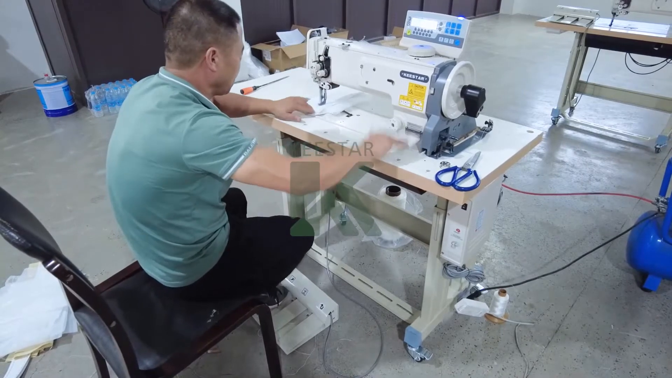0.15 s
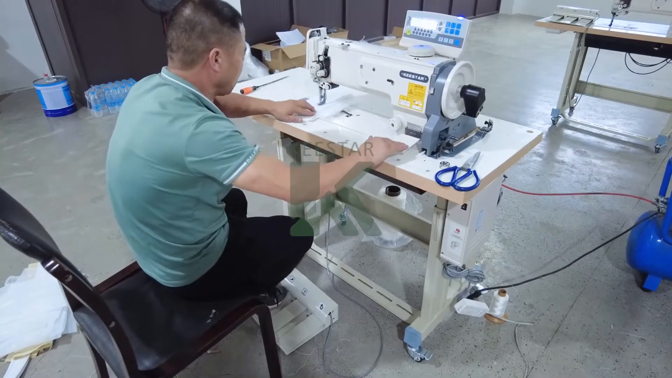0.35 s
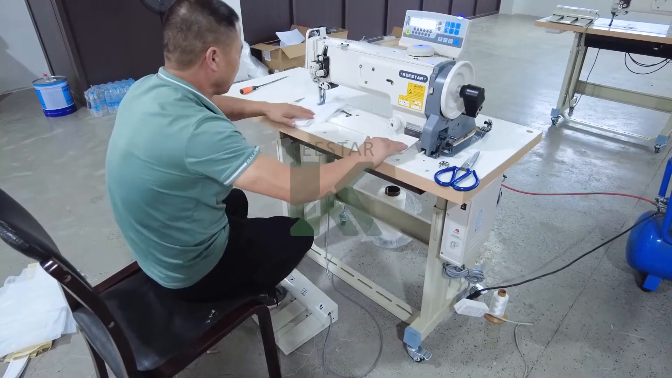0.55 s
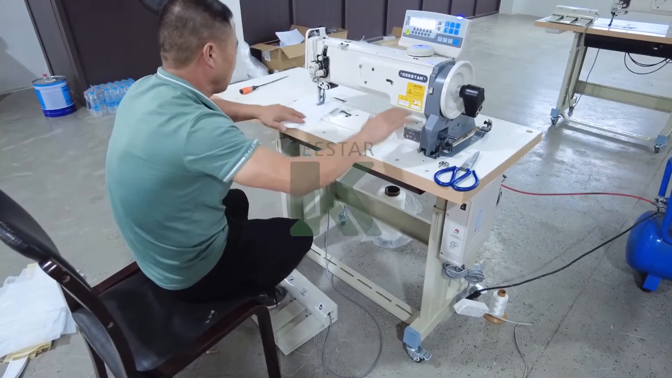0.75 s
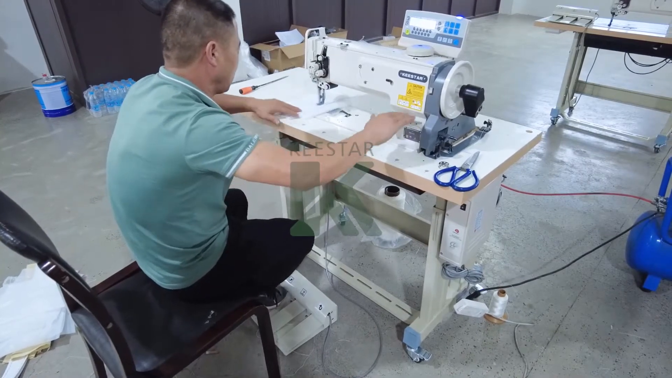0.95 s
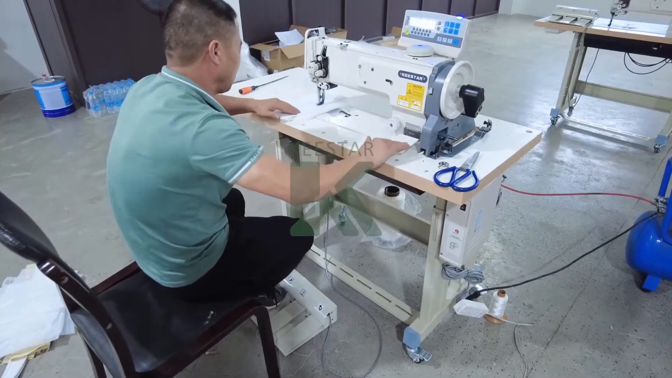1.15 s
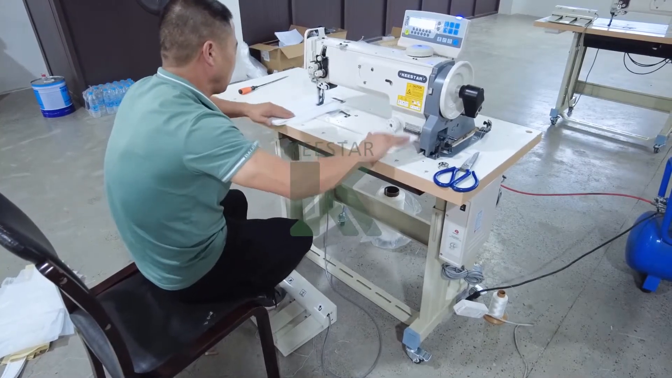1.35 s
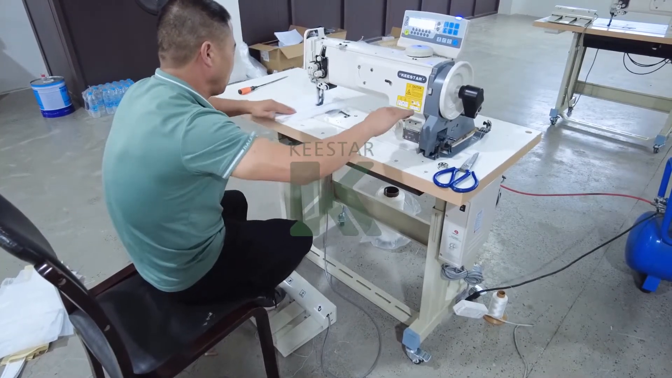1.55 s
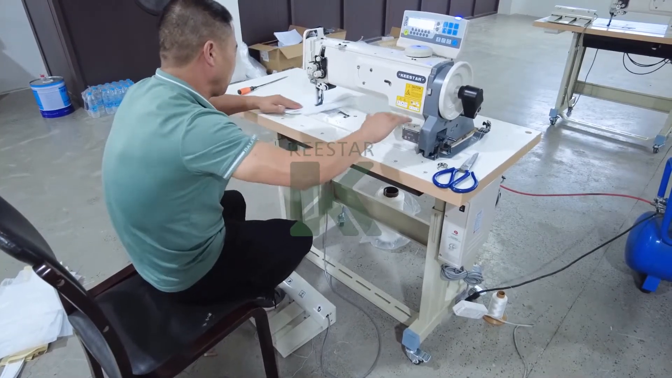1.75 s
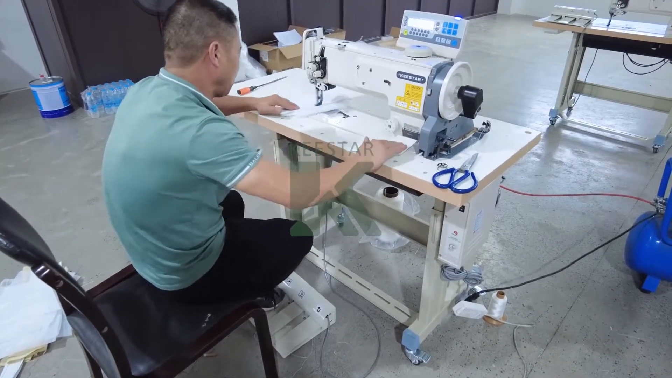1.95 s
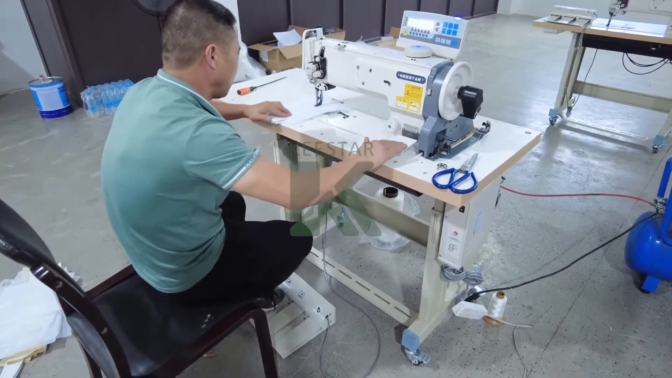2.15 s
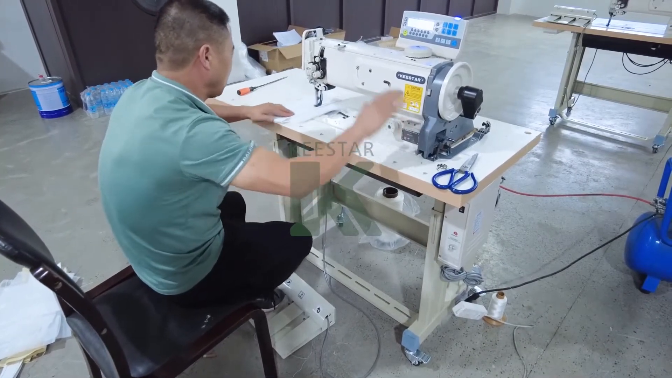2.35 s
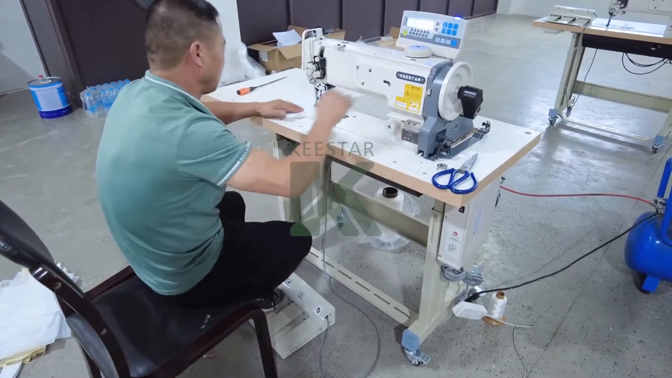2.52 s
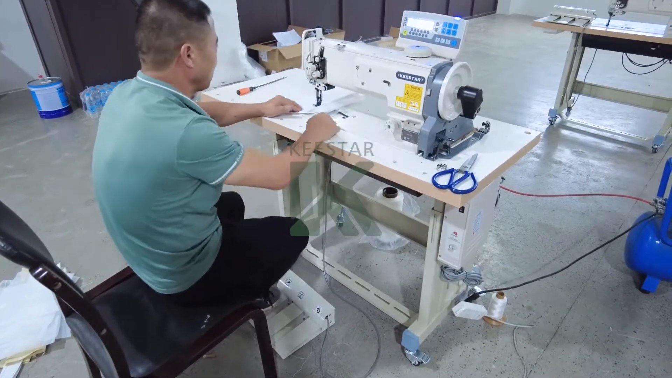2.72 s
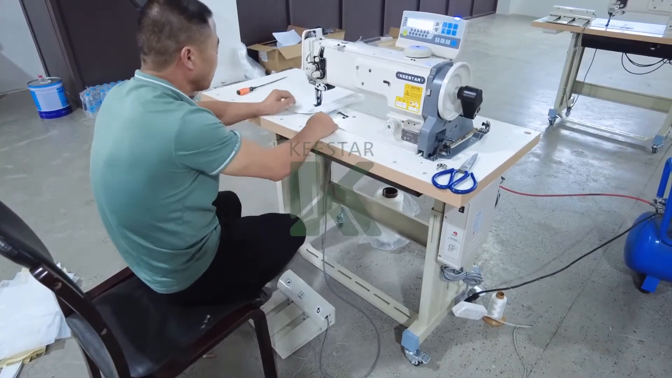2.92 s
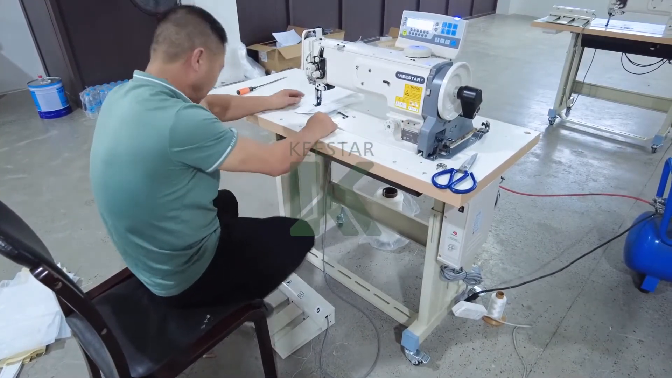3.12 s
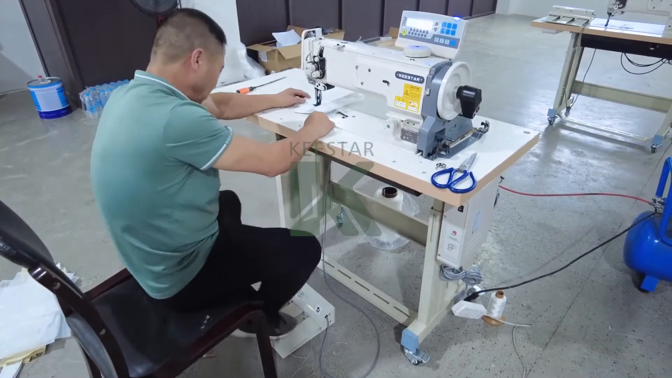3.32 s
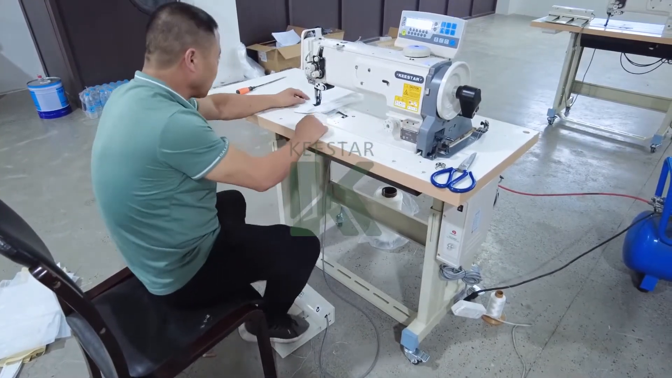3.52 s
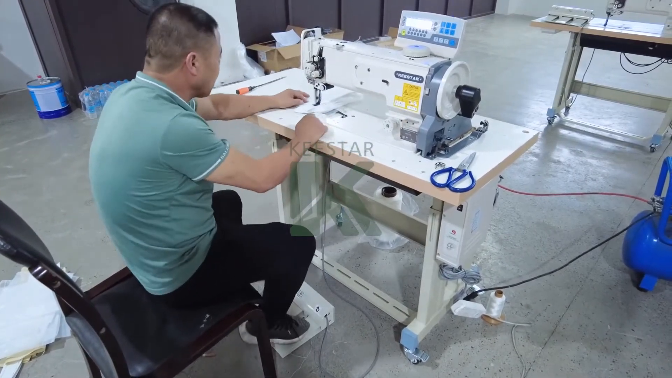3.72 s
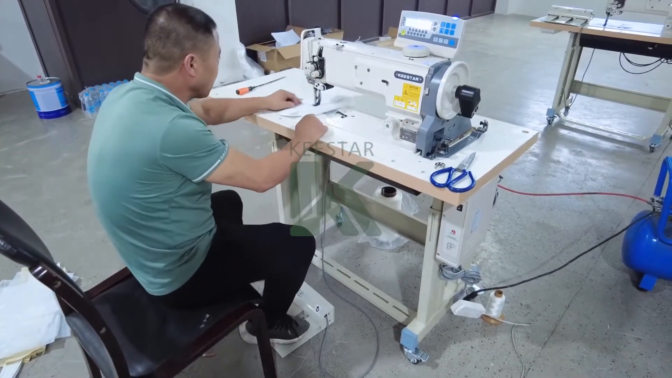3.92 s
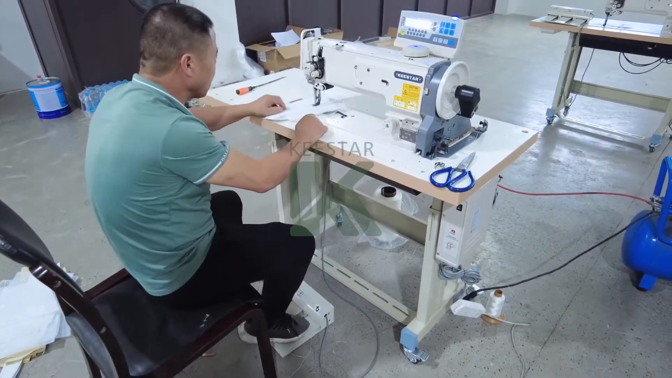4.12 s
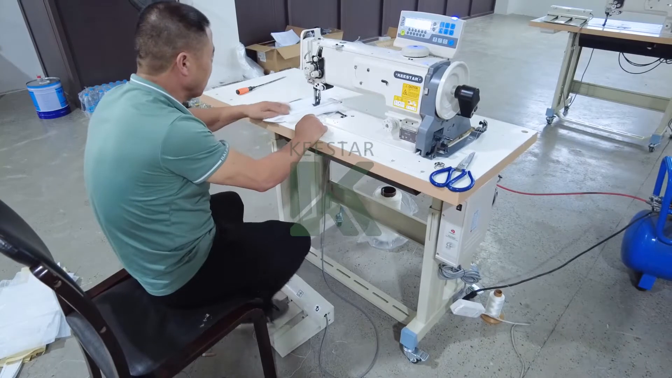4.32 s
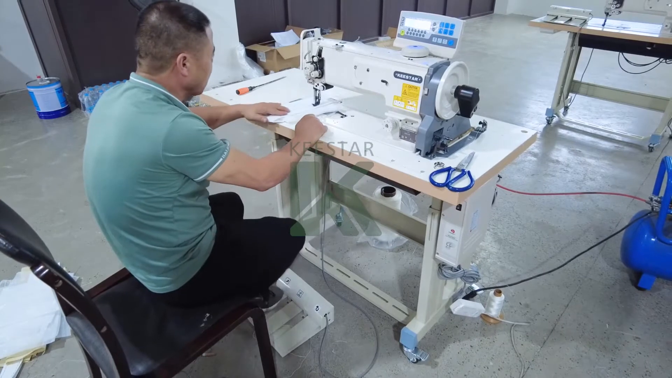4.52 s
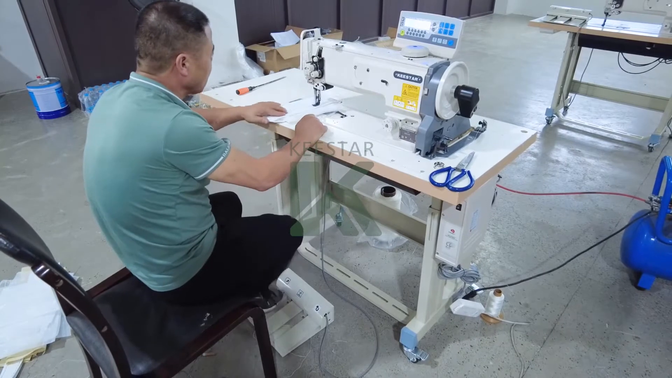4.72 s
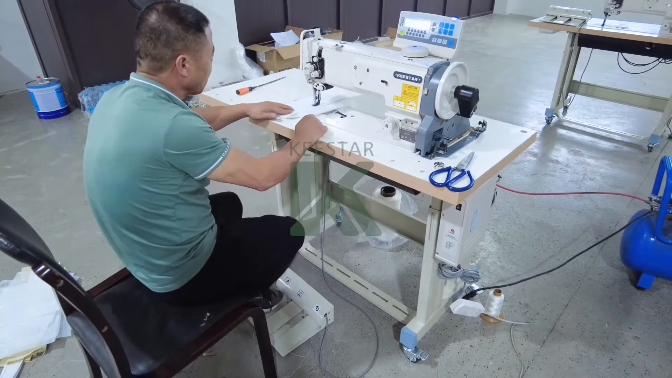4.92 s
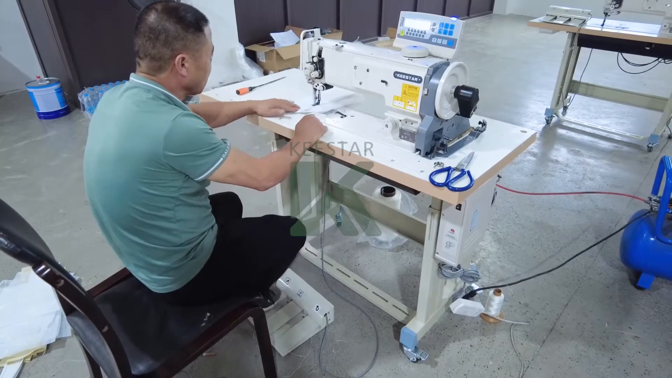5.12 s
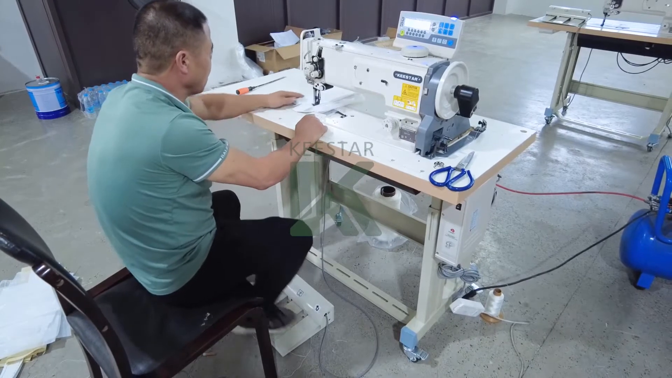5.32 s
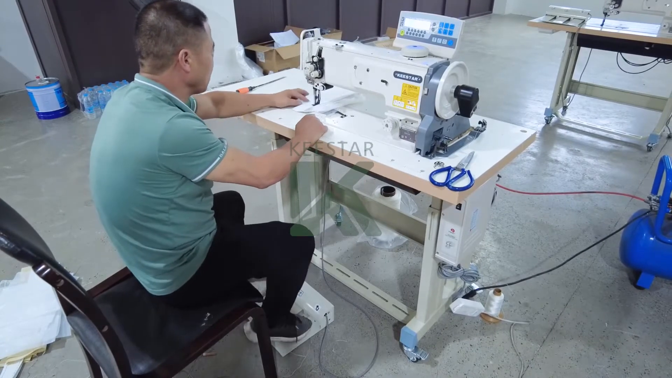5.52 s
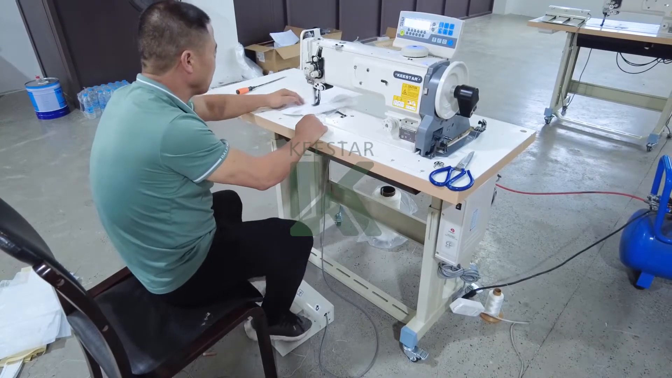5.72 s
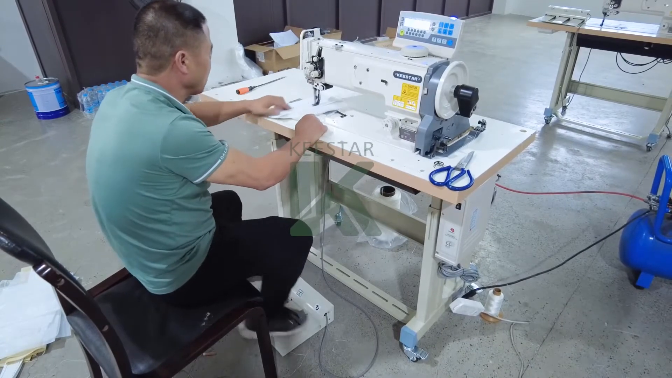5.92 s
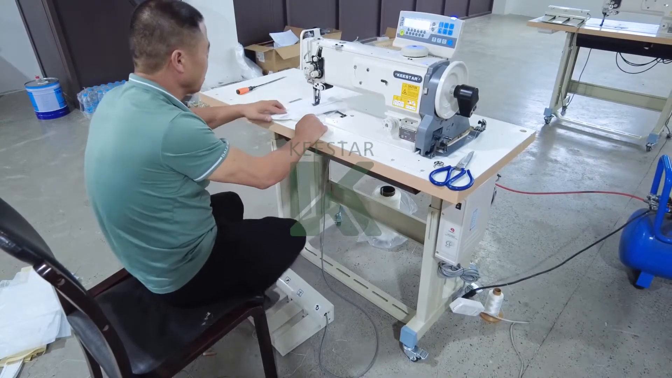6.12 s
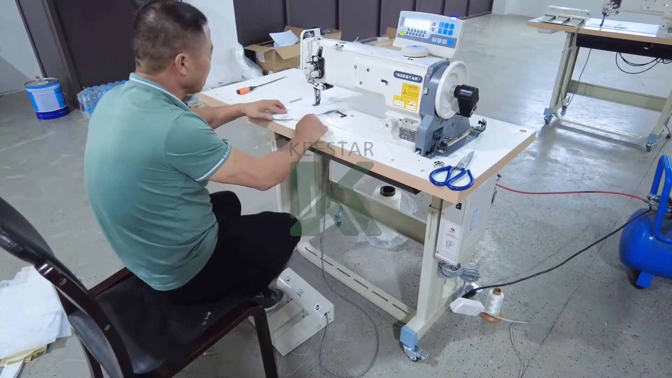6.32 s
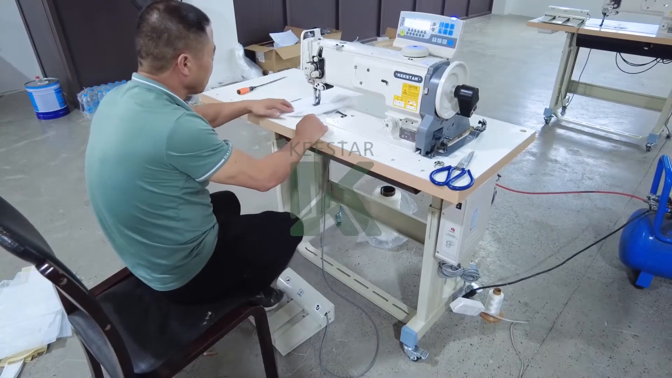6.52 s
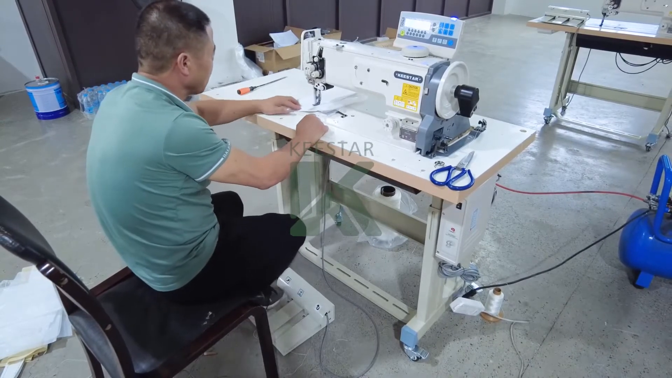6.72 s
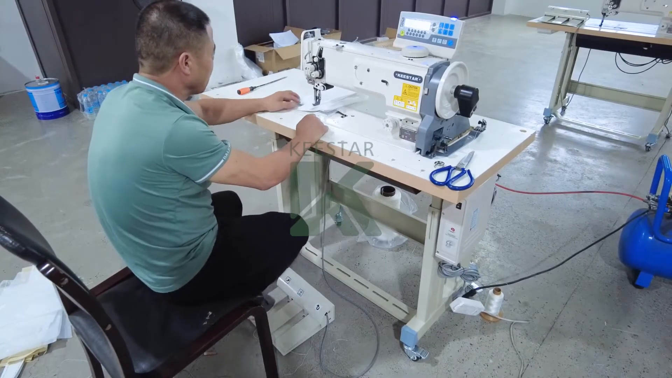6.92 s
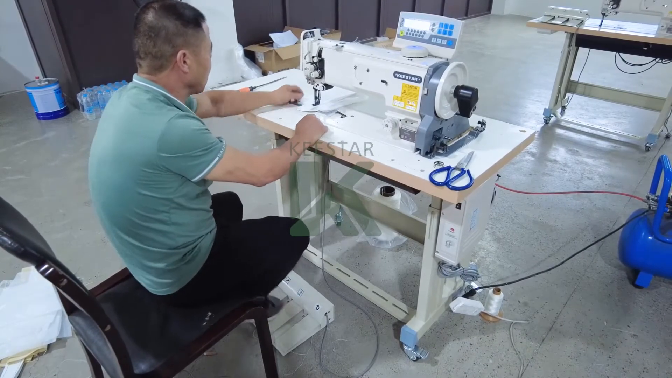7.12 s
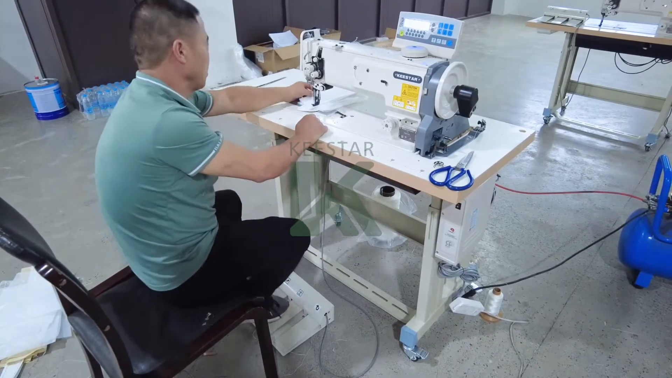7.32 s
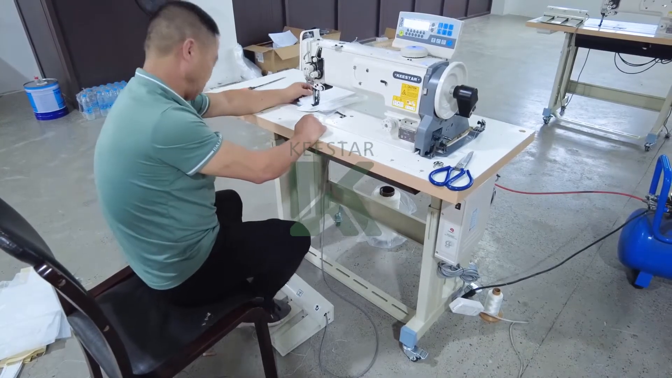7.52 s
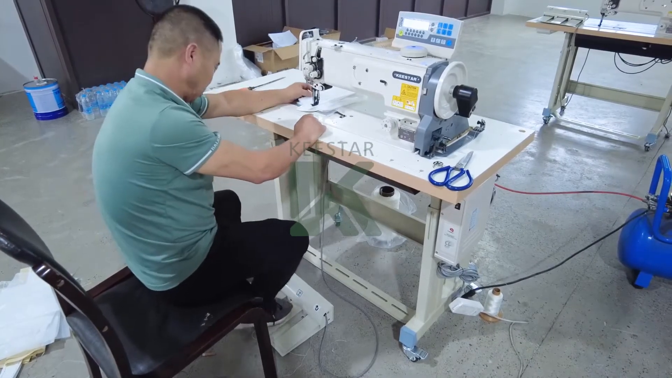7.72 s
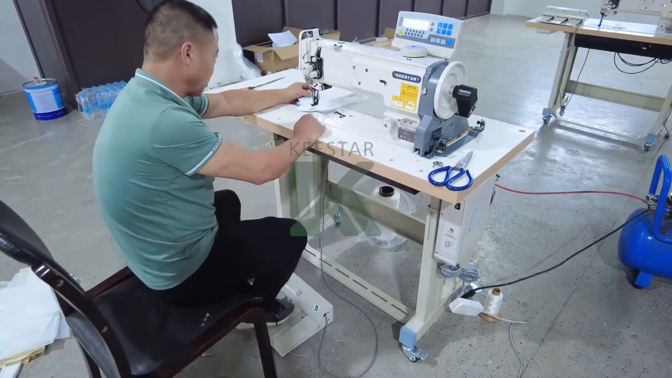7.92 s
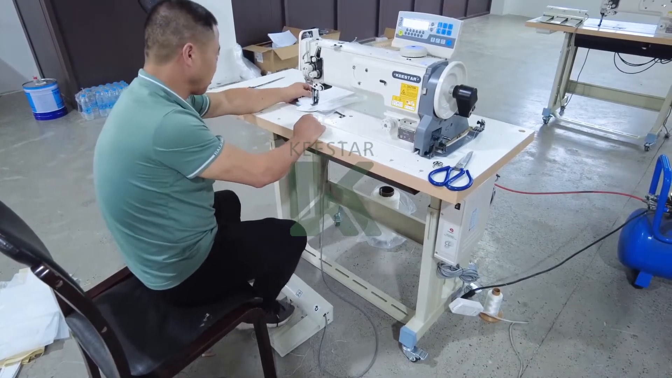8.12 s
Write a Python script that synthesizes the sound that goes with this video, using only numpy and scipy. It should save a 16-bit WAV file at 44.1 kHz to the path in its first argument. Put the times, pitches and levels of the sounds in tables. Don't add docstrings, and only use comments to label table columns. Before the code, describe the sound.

Deep mechanical sewing whirr with clanking metal, a ringing pause, four brief clutch-and-brake bursts, then a small air hiss over far factory hum.

```python
import sys
import numpy as np
from scipy import signal
from scipy.fft import rfft, irfft, next_fast_len
from scipy.io import wavfile
from scipy.ndimage import uniform_filter1d, map_coordinates

SR = 44100
rng = np.random.default_rng(int(sys.argv[2]) if len(sys.argv) > 2 else 0)


def store_wav(level_fs):
    pcm = np.round(np.clip(np.atleast_2d(level_fs), -1, 1) * 32767)
    wavfile.write(sys.argv[1], SR, pcm.T.astype(np.int16))


def magnitude_from_level(level_db):
    exponent = np.asarray(level_db, float) / 20
    return 10 ** exponent


N = 359856
LEAD = SR
M = N + LEAD
T = (np.arange(M) - LEAD) / SR


def unit(x):
    return x / np.sqrt(np.mean(x ** 2) + 1e-20)


def along(points, hz):
    f, v = np.transpose(points)
    return np.interp(np.log(hz + 1), np.log(f + 1), v)


def wobble(rate):
    steps = np.arange(0, M + 64, 64)
    knots = rng.standard_normal(int(M * rate / SR) + 5)
    return np.interp(np.arange(M), steps, map_coordinates(knots, [steps * rate / SR]))


def filtered(x, response):
    m = next_fast_len(x.shape[-1] + SR // 20)
    return irfft(rfft(x, m) * response(np.fft.rfftfreq(m, 1 / SR)), m)[..., :x.shape[-1]]


def modes(peaks, f):
    total = 0
    for k, (centre, width, db) in enumerate(peaks):
        total = total + (-1) ** k * magnitude_from_level(db) * 1j * f * width / (centre * centre - f * f + 1j * f * width)
    return total


def noise(spectrum, peaks=((1000, 100, -99),)):
    def colour(f):
        return magnitude_from_level(along(spectrum, f)) * np.sqrt(1 + abs(modes(peaks, f)) ** 2)
    return unit(filtered(rng.standard_normal(M), colour))


def patchy(x, depth_db, size, bins, frames):
    z = signal.stft(x, nperseg=size)[2]
    field = uniform_filter1d(uniform_filter1d(rng.standard_normal(z.shape), bins, 0), frames, 1)
    return unit(signal.istft(z * magnitude_from_level(depth_db * unit(field)), nperseg=size)[1][:M])


# (start [s], spin-up [s], stop [s], casting rush [dB])
RUNS = [
    (-1, .1, 2.57, -30),
    (3.6, .07, 4.1, -29),
    (4.65, .12, 5.06, -30),
    (5.42, .07, 5.88, -29.5),
    (6.25, .13, 6.67, -30),
]


def speed(late_s, power):
    rise_power, coast_s, coast_power = .85, .12, 1.5
    gain = 0
    for start, up, stop, db in RUNS:
        rise = np.clip((T - start) / up, 0, 1) ** (rise_power * power)
        fall = np.clip(1 + (stop + late_s - T) / coast_s, 0, 1) ** (coast_power * power)
        gain = gain + magnitude_from_level(db) * rise * fall
    return gain


def shaft_angle():
    shaft_hz, sag, sag_s = 26.57, .045, .16
    slowed = sum(np.clip((T - stop) / sag_s, 0, 1) * (T < stop + .3) for _, _, stop, _ in RUNS)
    return 2 * np.pi * shaft_hz * np.cumsum(1 - sag * slowed) / SR + 0.05 * wobble(5)


# (time [s], level [dB], half length [s])
SURGES = [(0, -25, .04), (.13, -23, .025), (.3, -18, .06), (.5, -22.5, .11), (.88, -20.5, .07),
          (1.17, -20, .08), (1.3, -26, .04), (1.53, -22, .11), (2.0, -16.5, .07), (2.12, -26, .02),
          (2.3, -23, .08), (2.54, -22, .08), (2.7, -19, .035), (2.8, -27, .04), (3.8, -22, .07),
          (4.05, -25, .03), (4.16, -16, .05), (4.68, -31, .03), (4.84, -22, .06), (5.1, -22, .1),
          (5.48, -28, .05), (5.63, -21, .06), (5.8, -20, .07), (5.95, -25, .04), (6.08, -23, .05),
          (6.29, -28, .025), (6.42, -22, .08), (6.53, -25, .04), (6.72, -23, .08), (6.86, -28, .06)]


def table_swell():
    surges = sum(magnitude_from_level(db - 4.5) * np.exp(-((T - s) / half) ** 2) for s, db, half in SURGES)
    return speed(late_s=.06, power=1) + surges


# (frequency [Hz], width [Hz], level [dB])
TABLE_MODES = [(240, 18.8, 2.5), (274, 30, -5), (307, 48, -10), (401, 34.5, -14.5), (523, 136, -19.5)]


def table_drum(swell):
    grind = unit(filtered(rng.standard_normal(M), lambda f: modes(TABLE_MODES, f)))
    return swell * magnitude_from_level(-6.5) * grind


# (multiple of shaft speed [1], level [dB])
ORDERS = [(2, -19), (4, -11.5), (5, -16), (8, -17), (10, -10), (11, -15), (12, -5), (13, -22), (14, -10),
          (16, -19), (18, -16), (19, -15), (21, -17), (40, -30), (43, -30), (50, -27)]


def shaft_hum(turn, swell):
    ninth = np.sin(9 * turn + .25 * wobble(9))
    orders = 0
    for k, db in ORDERS:
        strength = magnitude_from_level(db) * (1 + 0.3 * wobble(4))
        orders = orders + strength * np.sin(k * turn + (0.3 + .025 * k) * wobble(6))
    return swell * magnitude_from_level(0.3) * ninth + speed(0, 1) * magnitude_from_level(2) * orders


# (frequency [Hz], density [dB per Hz])
CASTING = [(25, -22), (60, -10), (110, -6.5), (180, -1.5), (300, 5.5), (500, -2), (680, -9.5), (1000, -3),
           (1500, -3.5), (2100, -8), (2400, -15), (3600, -19.5), (6000, -17.5), (9000, -44.5)]
# (frequency [Hz], width [Hz], level [dB])
CASTING_PEAKS = [(1320, 110, 3), (2840, 480, 10), (4380, 300, 4.5)]


def casting_rush(turn):
    throb = magnitude_from_level(3 + 1.2 * np.cos(2 * turn) + 1.3 * wobble(25))
    streaks = patchy(noise(CASTING, CASTING_PEAKS), depth_db=2.5, size=1024, bins=1, frames=3)
    return speed(0, 1) * (throb * streaks + magnitude_from_level(-6) * grit())


def grit():
    per_s, spread_db, centre_hz, cycles = 450, 4, 1550, 14
    at, tone, size = rng.random((3, round(per_s * M / SR)))
    hz = (centre_hz * np.exp(1.3 * (tone - .5)))[:, None]
    k = np.arange(600)
    strength = magnitude_from_level(spread_db * np.minimum(-np.log(1 - size), 3.2))[:, None]
    envelope = (1 - np.exp(-k / 30)) * np.exp(-k * hz / SR * 3 / cycles)
    rings = strength * envelope * np.sin(2 * np.pi * hz * k / SR)
    where = (at * M).astype(int)[:, None] + k
    return unit(np.bincount(where.ravel(), rings.ravel(), M + len(k))[:M])


# (frequency [Hz], density [dB per Hz])
BELT = [(3000, -21), (5500, -3), (8000, 4), (10000, -4.5), (12500, -3), (15600, -0.5), (16000, -37.5)]
# (frequency [Hz], width [Hz], level [dB])
BELT_PEAKS = [(7570, 140, -4.5), (9070, 280, 11.5), (10900, 540, 3), (14100, 400, 4)]


def belt_hiss(turn):
    throb = magnitude_from_level(-7.5 + 1.8 * np.cos(2 * turn) + 2.2 * wobble(30))
    rub = patchy(noise(BELT, BELT_PEAKS), depth_db=2, size=512, bins=5, frames=7)
    return speed(late_s=-.012, power=1.3) * throb * rub


# (frequency [Hz], level [dB])
CRACK = [(300, -10), (1200, 0), (3000, 1.5), (5000, -2.5), (8000, 4), (12000, -2), (16500, -8),
         (16900, -60)]


def strikes(events, metal, ring_db, rattle_db, knock_db, t60, rough, bright_hz=7000):
    out, blows = np.zeros(M + SR), np.zeros(M)
    hz, level_db, life = np.transpose(metal)[:, :, None]
    t = np.arange(round(min(life.max(), .4) * SR) + SR // 20) / SR
    for s, db, treble_db in events:
        level_luck, pitch_luck = rng.standard_normal((2, len(metal), 1))
        wander = rough * np.cumsum(rng.standard_normal((len(metal), len(t))), axis=1)
        level = magnitude_from_level(level_db + 1.6 * level_luck + (treble_db + 7.5) * (hz > bright_hz))
        pitch = hz * (1 + 0.0704 * rough * pitch_luck)
        decay = np.exp(-np.log(1000) * t / life)
        ring = np.sum(level * decay * np.sin(2 * np.pi * pitch * t + wander), axis=0)
        puff = rng.standard_normal(len(t)) * (magnitude_from_level(-60 * t / t60) + 1.3 * magnitude_from_level(-60 * t / 0.0074))

        def colour(f):
            return magnitude_from_level(along(CRACK, f) + np.interp(f, [6000, 8000], [0, treble_db + 8.5]))
        rattle = filtered(puff, colour)
        onset = 1 - np.exp(-t / 0.0009)
        at = LEAD + round(s * SR)
        out[at:at + len(t)] += magnitude_from_level(db) * (magnitude_from_level(ring_db) * ring + magnitude_from_level(rattle_db) * rattle) * onset
        blows[at] = magnitude_from_level(db + knock_db + 42)
    return out[:M] + filtered(blows, lambda f: modes(TABLE_MODES, f))


# (time [s], peak [dB], treble [dB])
CLANKS = [(0.1106, -15.5, -19), (1.0185, -23, -21), (1.2745, -21, -10), (1.791, -18, -18),
          (2.1544, -21, -9), (4.709, -35, -5), (4.728, -23.5, -13), (6.3164, -33, -3), (6.342, -23, -13)]
# (frequency [Hz], level [dB], t60 [s])
BAR = [(1700, -2, 0.066), (2910, -2.5, .07), (2966, 1, .07), (4070, 0, 0.1), (6010, -4, 0.08),
       (7750, 1, 0.12), (9760, 0, 0.079), (10950, -8.5, 0.11), (11830, 0.5, 0.045)]


def needle_bar():
    return strikes(CLANKS, BAR, ring_db=-12, rattle_db=-5.5, knock_db=-12, t60=.05, rough=.12)


# (time [s], peak [dB], treble [dB])
CHATTER = [(.5995, -17, -9), (.6347, -24, -11), (.6818, -9, -11), (.6925, -13, -11), (.7005, -16, -11),
           (.712, -14, -11), (.7225, -17, -11), (.731, -15, -9), (.7385, -14, -7), (.749, -16, -9),
           (.765, -20, -10), (1.3127, -15, -6), (1.364, -21, -10), (1.3726, -13, -10), (1.381, -16, -10),
           (1.392, -19, -11), (2.1425, -19, -9), (2.2056, -8, -9), (2.215, -15, -10), (2.2336, -14, -8),
           (2.243, -14, -10), (2.255, -18, -10), (2.27, -19, -11), (2.288, -21, -11), (4.0608, -21, -14),
           (4.0724, -17, -12), (4.082, -19, -13), (4.091, -19, -13)]
# (frequency [Hz], level [dB], t60 [s])
FOOT = [(1700, -2, .05), (2910, -2, .045), (4070, 2, .06), (4400, -6, .04), (6010, -1, .045),
        (6400, -5, .04), (7750, 1, .08), (9400, 0, .05), (10950, -5, .06), (11830, -3, .035)]


def foot_chatter():
    return strikes(CHATTER, FOOT, ring_db=-12, rattle_db=-6, knock_db=-14, t60=.04, rough=.16)


# (time [s], peak [dB], take-up length before it [s], take-up scrape [dB])
STARTS = [
    (3.6502, -4.5, .0386, -3),
    (5.4794, -6, .0434, 4),
]
# (share of take-up [1], level [dB], treble [dB])
GRIP = [
    (-1.2, -35, -4),
    (-1, -21, -9),
    (-.664, -12.5, -18),
    (.02, -3, -6),
    (.1, -1.5, -22),
    (.27, -10, -18),
    (.34, -12, -20),
]
# (frequency [Hz], level [dB], t60 [s])
CLUTCH = [(1292, -1.5, .08), (1670, -7, .05), (2050, -8, 0.034), (2750, 1.5, 0.039), (3320, 1.5, .035),
          (4260, -9, .03), (5800, -14, .03), (7800, 1, .03)]


def clutch():
    grips = []
    for s, db, length, scrape_db in STARTS:
        for share, rel_db, treble_db in GRIP:
            grips.append((s + share * length, db + rel_db + scrape_db * (share == -1), treble_db))
    return strikes(grips, CLUTCH, ring_db=-7, rattle_db=-6, knock_db=-16, t60=.014, rough=0.19)


# (time [s], peak [dB], treble [dB])
BRAKE = [
    (4.1384, -6.5, -6),
    (4.1425, -12, -11),
    (4.149, -17, -12),
]
# (frequency [Hz], level [dB], t60 [s])
BRAKE_RING = [(1597, -10, .08), (2670, 4, 0.033), (3240, -3, 0.097), (4463, -9, 0.08), (5960, -8, .07),
              (7600, -6.5, 0.33), (8694, -5, .06), (9700, -4, 0.08), (10620, -14, 0.087)]


def brake():
    return strikes(BRAKE, BRAKE_RING, ring_db=-12, rattle_db=-1.5, knock_db=-11.5, t60=.04, rough=.08)


# (time [s], peak [dB], treble [dB])
LEVER = [
    (5.845, -21, -10),
    (5.8495, -12.5, -10),
    (5.8555, -12, -12),
    (5.862, -17, -16),
    (5.8741, -18, -20),
    (5.8947, -22, -19),
    (5.9197, -21, -15),
    (5.928, -24, -16),
]
# (frequency [Hz], level [dB], t60 [s])
LEVER_RING = [(1066, 2, 0.12), (1475, -11, .1), (1770, 2, .06), (2460, -9, .4), (2490, -2.5, 0.6),
              (3030, -7, 0.22), (4730, -3, 0.04), (5080, 6, 0.035), (5300, 3, .03), (6300, -8, .04),
              (7640, -1, .05)]


def lever():
    return strikes(LEVER, LEVER_RING, ring_db=-8.5, rattle_db=-3, knock_db=-8, t60=.07, rough=0.06,
                   bright_hz=4300)


# (time [s], peak [dB], treble [dB])
FIDGETS = [(3.056, -39, -15), (3.0917, -37, -15), (3.104, -36, -17), (3.2164, -46, -22), (3.4974, -39, -11),
           (3.5594, -37, -13), (4.5423, -27.5, -20), (4.558, -33, -22), (6.2303, -32, -22),
           (7.019, -39, -11), (7.0476, -40, -12), (7.0838, -37, -15.5), (7.841, -29, -12),
           (7.8597, -27, -24), (7.8821, -26, -21), (7.9294, -36, -19), (8.024, -41, -4), (8.0438, -29, -3),
           (8.0536, -20, -9)]
# (frequency [Hz], level [dB], t60 [s])
TOOL = [(700, -6, .08), (1080, -3, 0.12), (1740, -1, .05), (3200, -5, 0.087), (4750, -2, .07),
        (5150, -1, .07), (5400, -6, .05)]


def fidgets():
    return strikes(FIDGETS, TOOL, ring_db=-11, rattle_db=-7, knock_db=-6, t60=.11, rough=.15)


# (time [s], air [dB], thrum [dB], pitch [Hz])
LIFT = [
    (8.03, -50, -52, 240),
    (8.045, -36, -45, 245),
    (8.06, -30, -35, 255),
    (8.09, -31.5, -31.5, 282),
    (8.12, -36.5, -30, 320),
    (8.16, -47, -45, 340),
]


def lifter():
    s, air_db, thrum_db, hz = np.transpose(LIFT)
    jet = noise([(500, 5), (3000, -2), (9000, -8), (15700, -10), (16000, -41)])
    air = np.interp(T, s, magnitude_from_level(air_db - 2.5), left=0) * jet
    tone = np.sin(2 * np.pi * np.cumsum(np.interp(T, s, hz)) / SR + 1.1 * wobble(40))
    return air + np.interp(T, s, magnitude_from_level(thrum_db + 2.5), left=0) * tone


# (time [s], level [dB], frequency [Hz], t60 [s])
THUMPS = [
    (4.075, -24, 68, 0.22),
    (5.85, -27.5, 58.5, 0.25),
    (4.4, -33, 97, .12),
    (5.48, -35, 80, 0.096),
    (8.05, -16.5, 487, 0.038),
    (8.051, -18.5, 120, 0.032),
]


def thumps():
    total = 0
    for s, db, hz, t60 in THUMPS:
        age = np.maximum(T - s, 0)
        total = total + magnitude_from_level(db - 60 * age / t60) * np.sin(2 * np.pi * hz * age)
    return total


# (frequency [Hz], level [dB])
NEAR = [(60, -20), (300, -25), (600, -8), (3000, -9), (8000, -9), (13000, -3)]


def nearby(x):
    t = np.arange(SR // 20) / SR
    scatter = rng.standard_normal(len(t)) * magnitude_from_level(-60 * t / .03)
    scattered = signal.oaconvolve(x, scatter / np.linalg.norm(scatter))[:M]
    side = filtered(scattered, lambda f: magnitude_from_level(along(NEAR, f)))
    return np.array([x + side, x - side])


# (frequency [Hz], correlation [1])
ALIKE = [(60, .98), (130, .96), (240, .88), (400, 0.71), (600, 0.17), (1000, 0.022), (2500, 0.37),
         (5000, -0.29), (12000, 0.55)]


def spread(pair):
    def weights(f):
        angle = np.arccos(np.clip(along(ALIKE, f), -1, 1)) / 2
        return np.array([np.cos(angle), np.sin(angle)])
    mid, side = filtered(pair, weights)
    return np.array([mid + side, mid - side])


# (frequency [Hz], t60 [s])
HALL = [(60, 1.5), (250, 2), (1000, 1.91), (3000, 1.63), (7000, .95), (14000, 0.27)]


def hall(x):
    hz, t, z = signal.stft(rng.standard_normal((2, 2 * SR)), SR, nperseg=512)
    tail = signal.istft(z * magnitude_from_level(-60 * t / along(HALL, hz)[:, None]), SR, nperseg=512)[1]
    tail = spread(filtered(tail, lambda f: magnitude_from_level(60 * np.log10(1.5 / along(HALL, f)) / 6)))
    late = np.pad(x, (400, 0))[None]
    return signal.fftconvolve(late, tail / np.linalg.norm(tail[0]), axes=1)[:, :M]


# (frequency [Hz], density [dB per Hz])
FACTORY = [(12, -36), (20, -3), (53, -4), (74, -15), (106, -9), (157, -11.5), (372, -22.5), (478, -23),
           (857, -26), (1270, -21.5), (2470, -27), (2760, -27), (6910, -43.5), (15500, -55.5)]


def factory():
    level = magnitude_from_level(-40.5 + 0.29 * wobble(2.81))
    return level * spread(np.array([noise(FACTORY), noise(FACTORY)]))


def scene():
    turn, swell = shaft_angle(), table_swell()
    drum = table_drum(swell)
    hum = shaft_hum(turn, swell)
    running = casting_rush(turn) + belt_hiss(turn)
    clanks = needle_bar() + foot_chatter() + clutch() + brake() + lever() + fidgets()
    clanks += lifter() + thumps()
    direct = nearby(drum + hum + magnitude_from_level(-3.5) * running + clanks)
    wet = hall(magnitude_from_level(-3) * drum + magnitude_from_level(-9) * hum + magnitude_from_level(-2.0) * running + magnitude_from_level(-2.0) * clanks)
    return (direct + wet + factory())[:, LEAD:]


def top_cut(x):
    return signal.sosfilt(signal.butter(12, 16820, fs=SR, output="sos"), x)


# (frequency [Hz], left minus right [dB])
LEAN = [(60, -1.0), (120, -0.5), (240, 1), (480, 0), (950, 2.5), (1890, 0.5), (3770, 1.0), (7520, 0.0),
        (15000, 1.5)]


def record(dry):
    def colour(f):
        half_db = .5 * along(LEAN, f)
        return magnitude_from_level(np.array([half_db, -half_db])) * (f < 16750)
    ports = filtered(dry, colour)
    return top_cut(ports)


dry = scene()
out = record(dry)
store_wav(out)
```